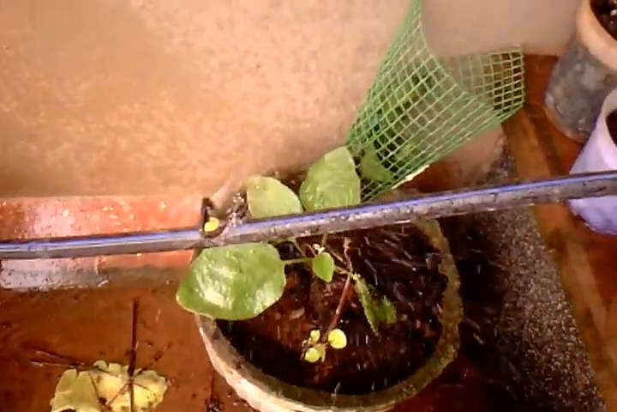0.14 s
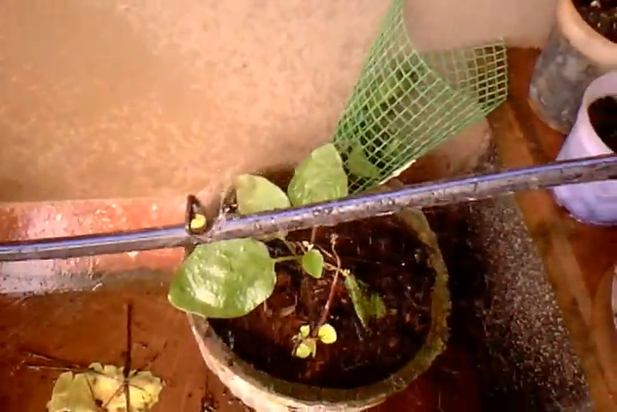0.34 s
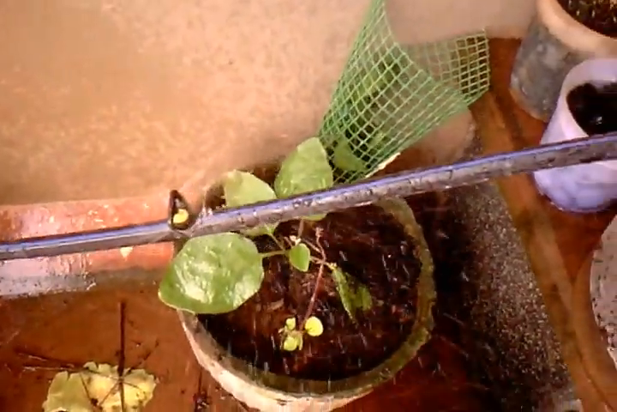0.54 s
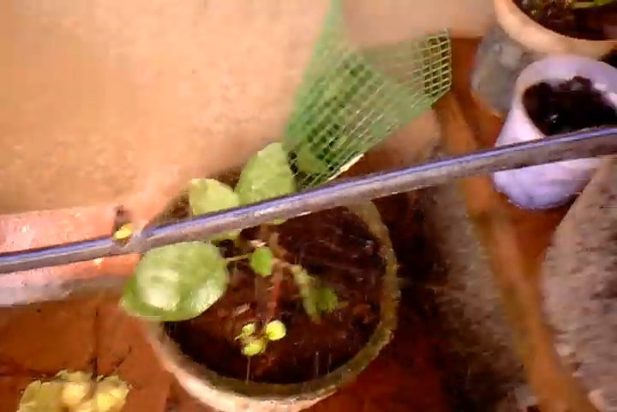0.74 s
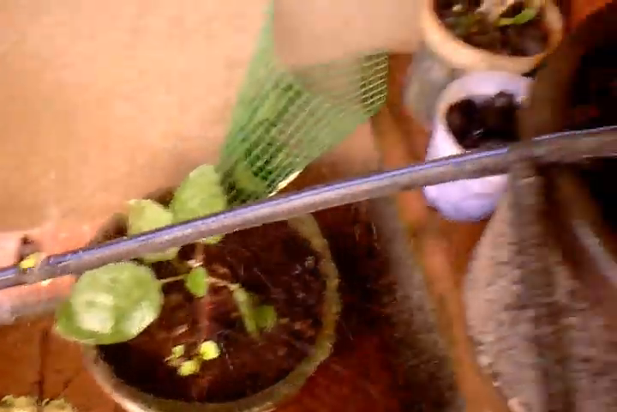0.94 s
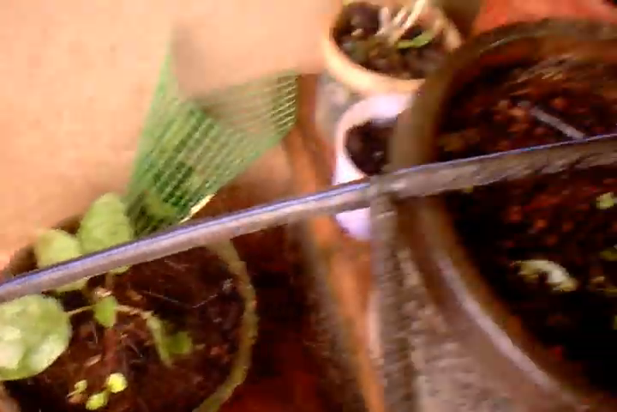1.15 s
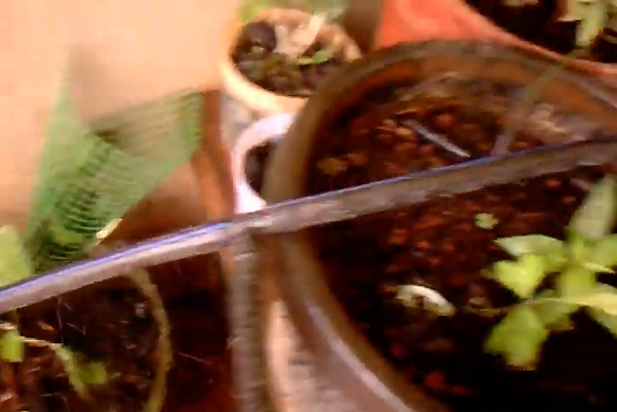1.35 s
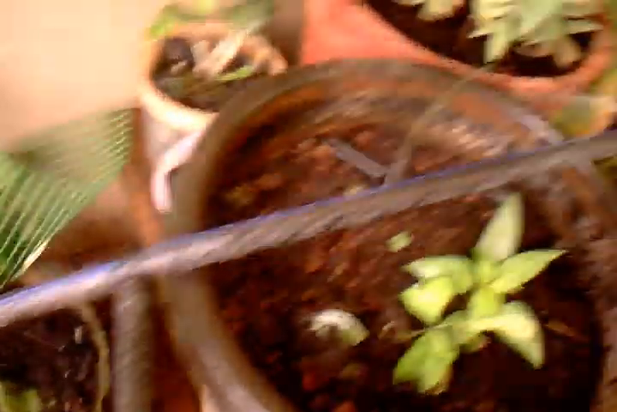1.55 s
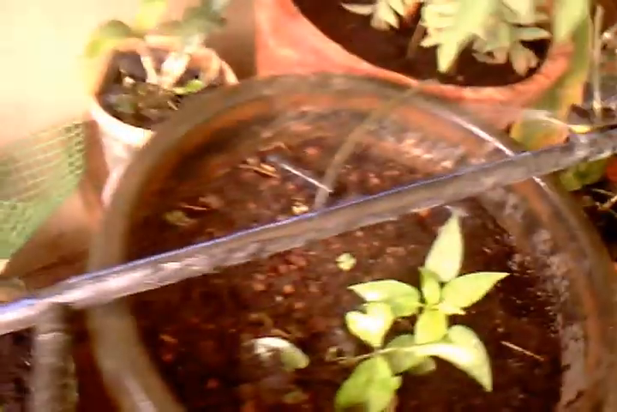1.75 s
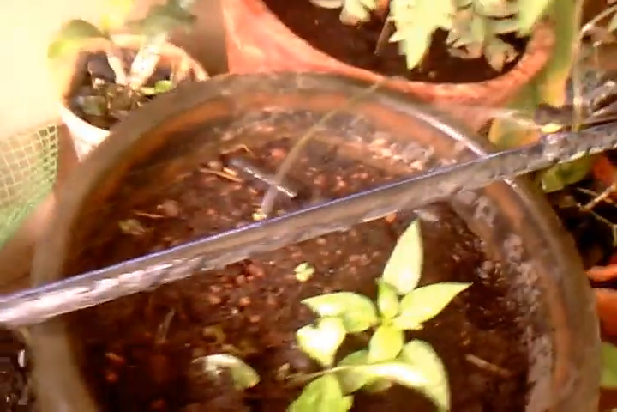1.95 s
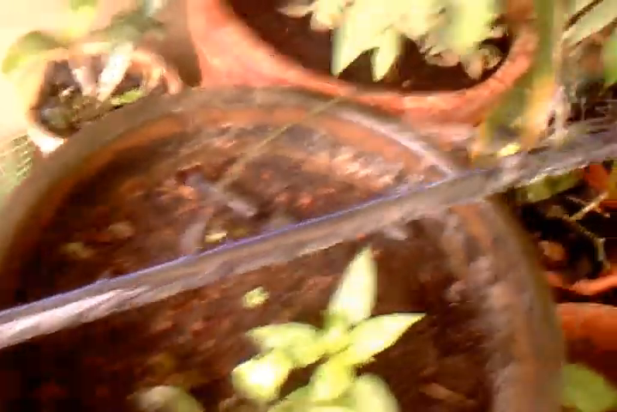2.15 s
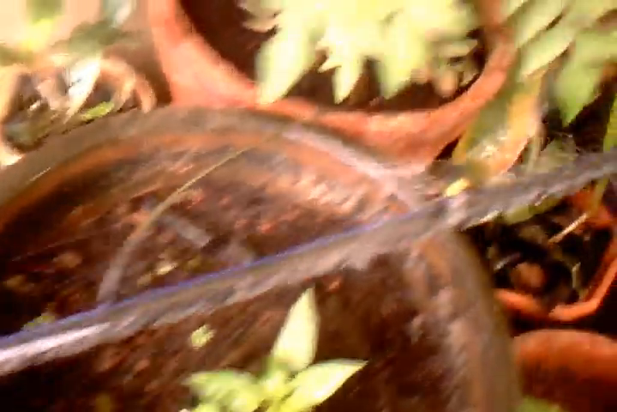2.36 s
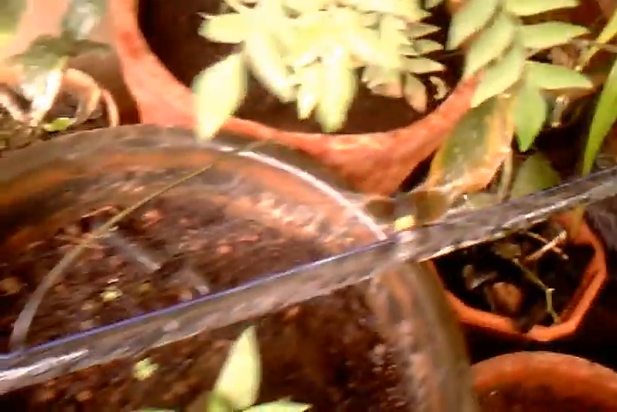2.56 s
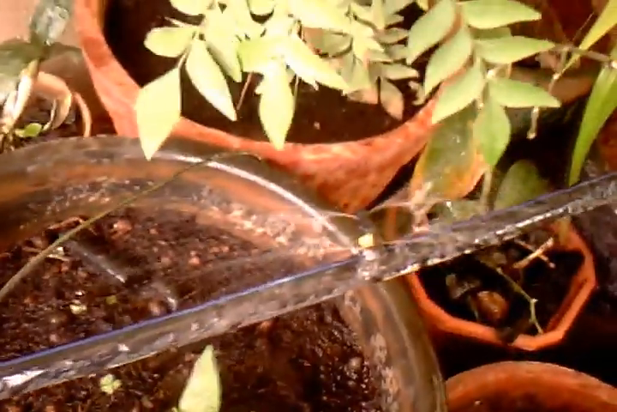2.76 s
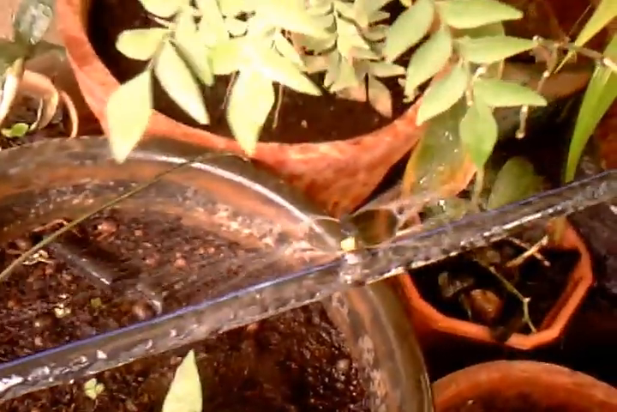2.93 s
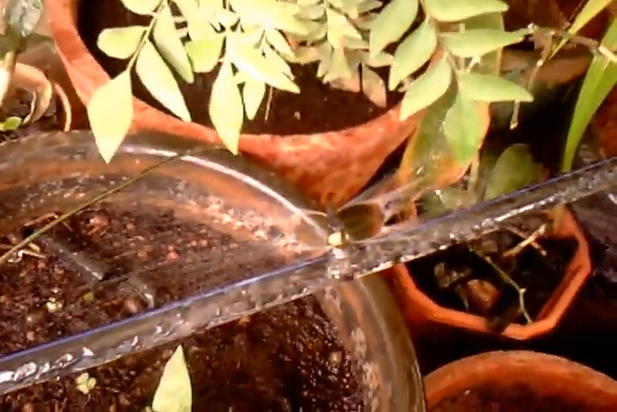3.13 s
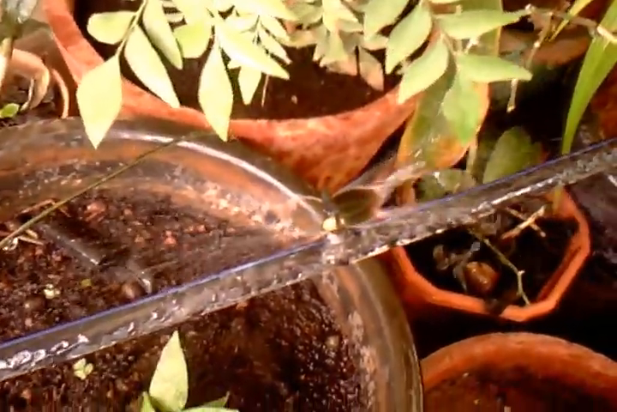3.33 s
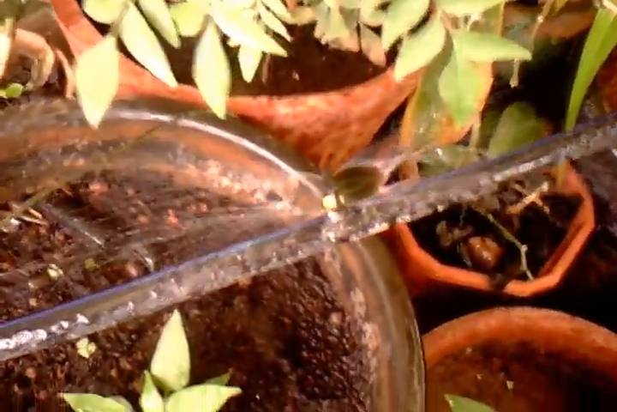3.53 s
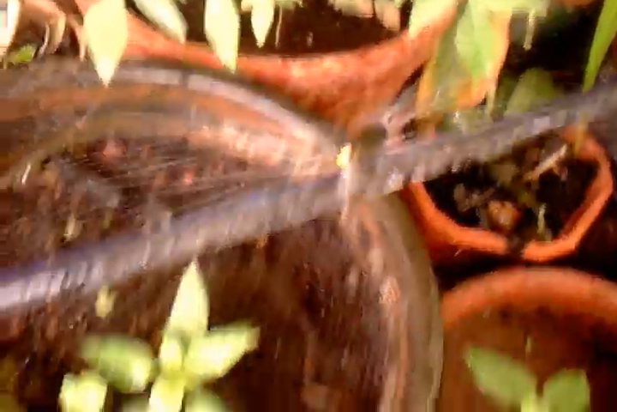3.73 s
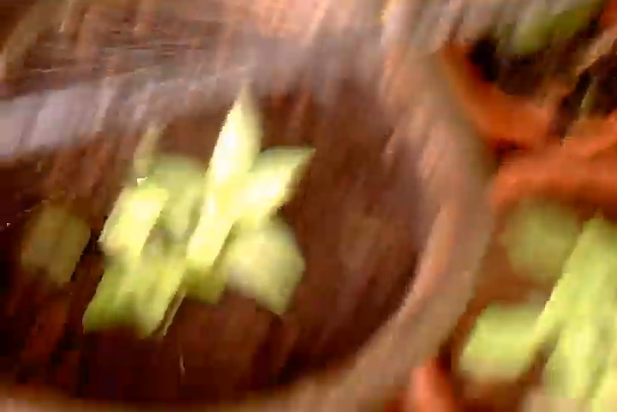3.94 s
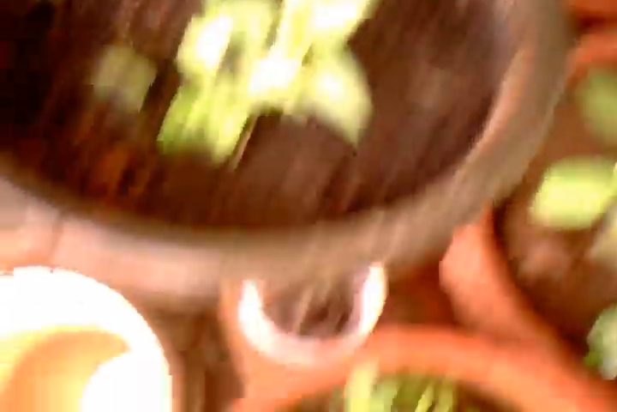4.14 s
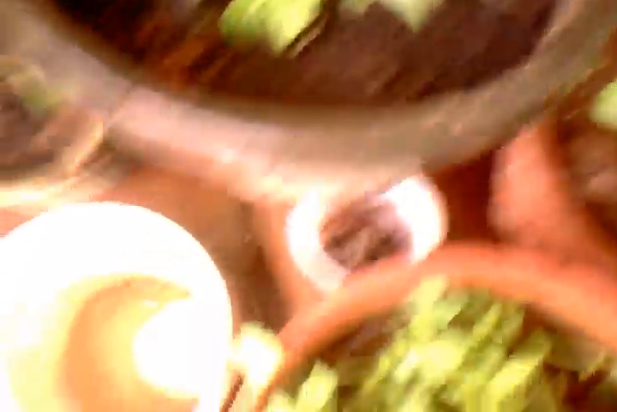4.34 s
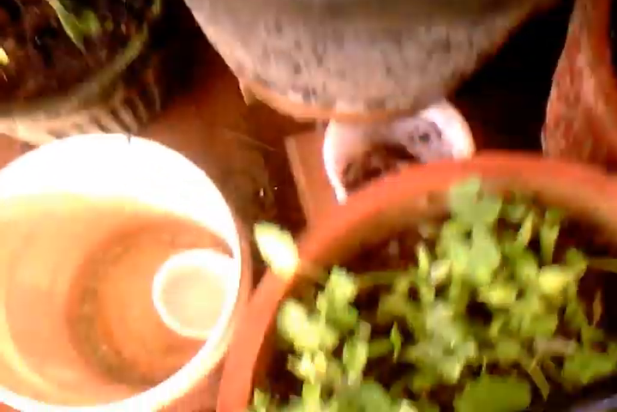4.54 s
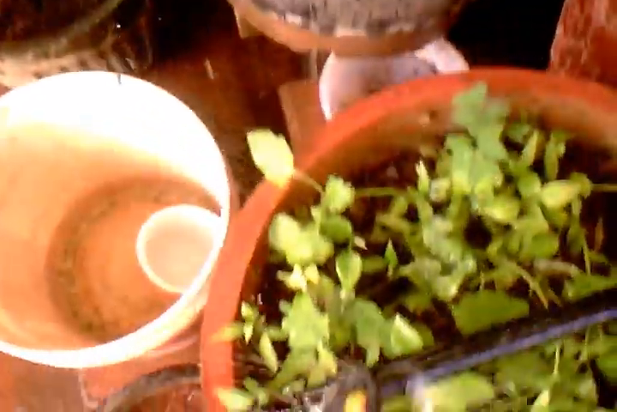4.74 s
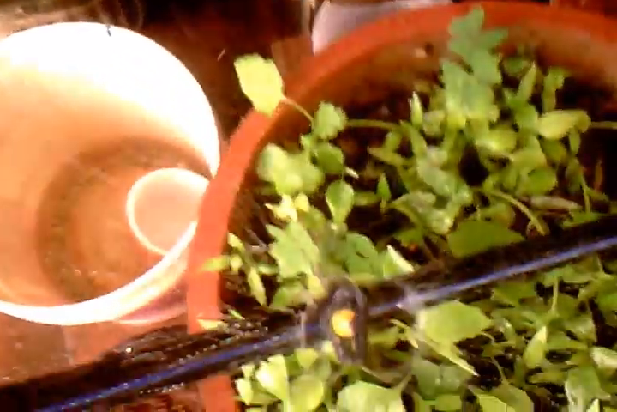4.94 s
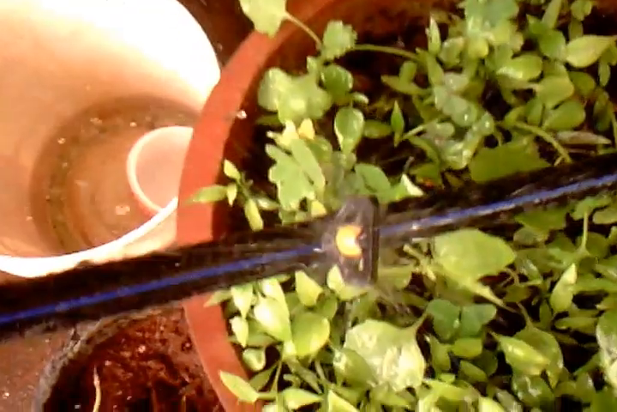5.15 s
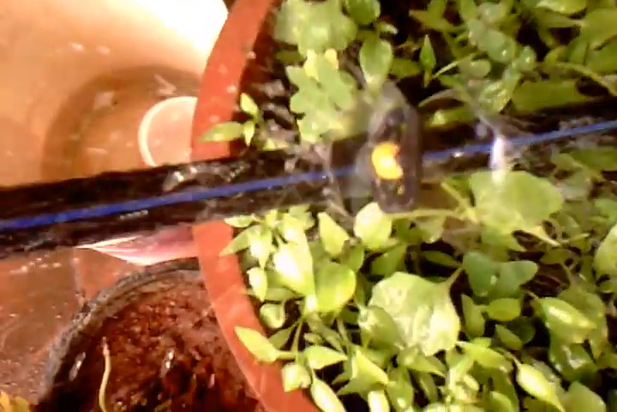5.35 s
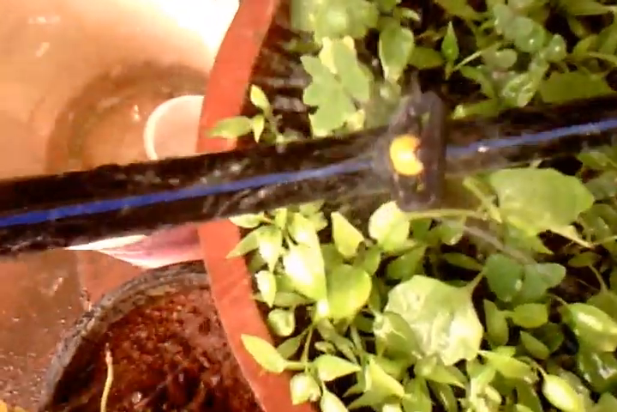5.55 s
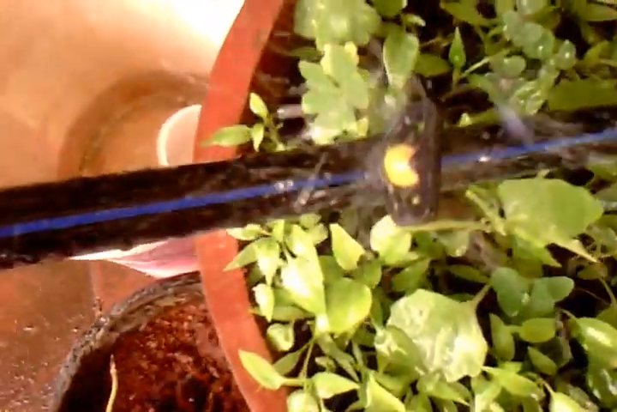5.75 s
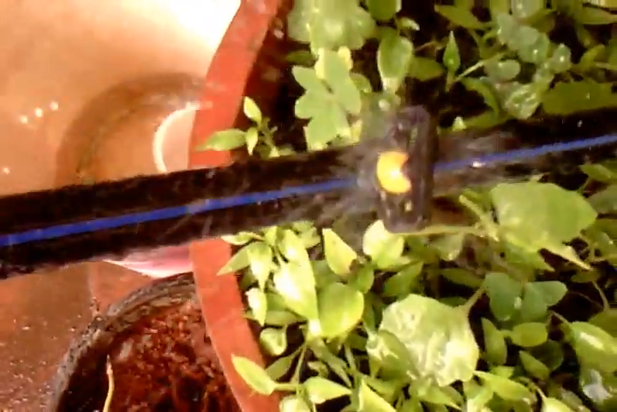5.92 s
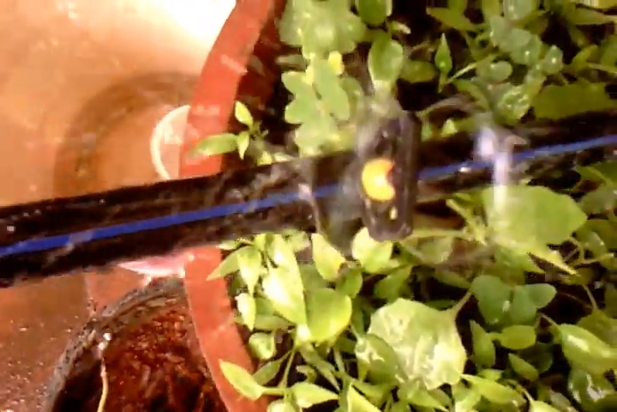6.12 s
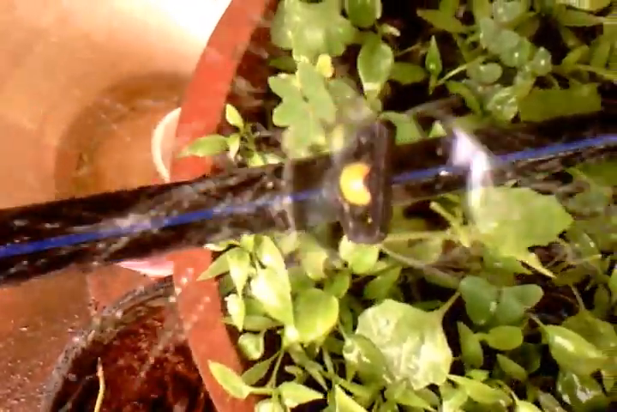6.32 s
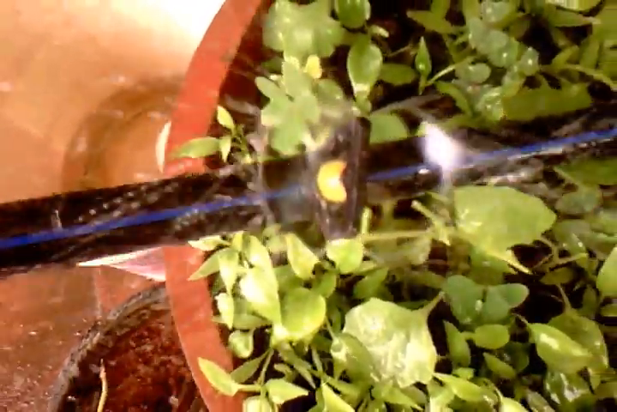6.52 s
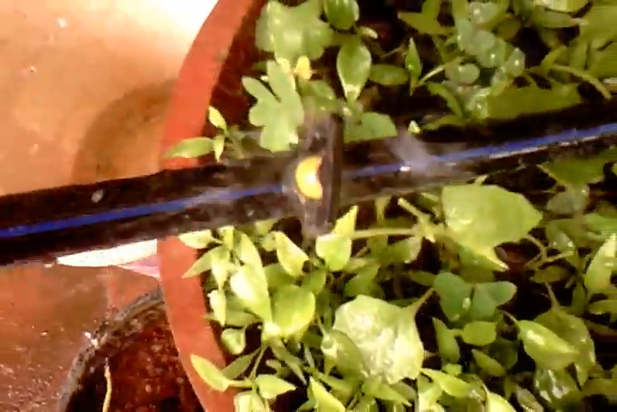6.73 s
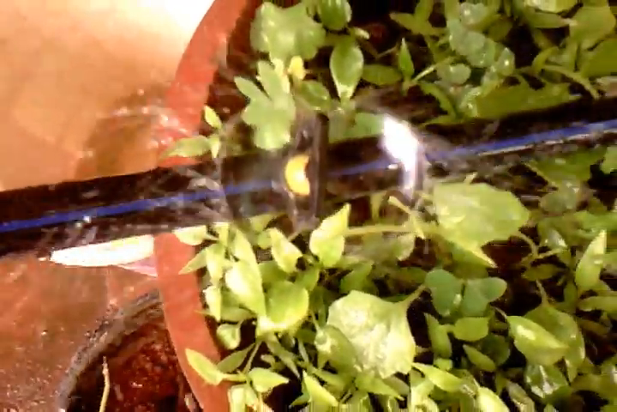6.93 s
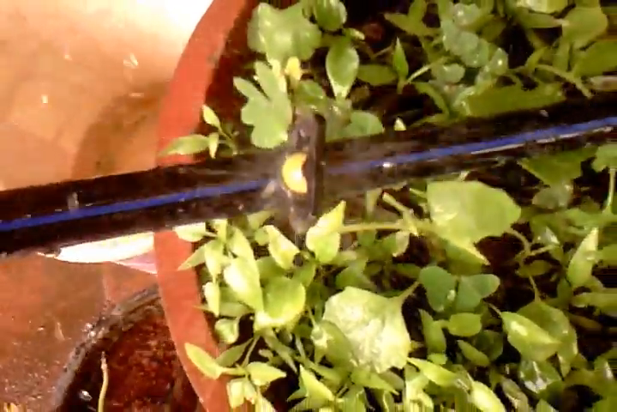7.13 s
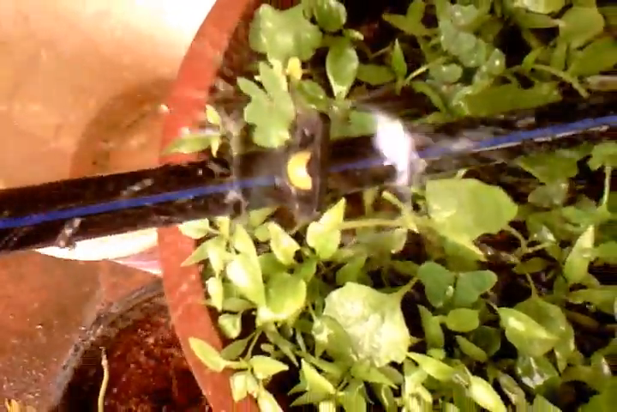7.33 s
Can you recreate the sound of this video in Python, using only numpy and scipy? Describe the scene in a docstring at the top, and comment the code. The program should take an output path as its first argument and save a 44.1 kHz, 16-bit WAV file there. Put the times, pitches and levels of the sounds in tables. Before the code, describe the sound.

Irregular high ticks and wet sputters come from a drip line's spray nozzle, soft at first, then sharp and close.

```python
"""Air trapped in a garden drip line spits through a micro-sprayer on a balcony. Each spurt is a dense
crackle that rings the nozzle's short air column; bursting bubbles pop out on top, and hard walls add a
short tail. Underneath sit far traffic, a hiss of mist and faint chirrs. Three dull knocks bump the phone
that hears it all, in mono at 16 kHz; after the first, spurts and background are louder."""
import sys
import numpy as np
from scipy import signal
from scipy.fft import rfft, irfft
from scipy.io import wavfile
from scipy.ndimage import uniform_filter1d

SR = 44100
rng = np.random.default_rng(int(sys.argv[2]) if len(sys.argv) > 2 else 0)


def generate_wav(signal):
    """Clip the signal to [-1, 1] and save it as 16-bit WAV at the path in sys.argv[1]."""
    frames = np.transpose(np.atleast_2d(signal))
    scaled = np.clip(frames, -1, 1) * 32767
    pcm = np.round(scaled).astype(np.int16)
    wavfile.write(sys.argv[1], SR, pcm)


N = 325458

# Table levels are relative: each layer adds its own gain.
# Spectrum of the far traffic: f/Hz, level/dB
TRAFFIC_SPECTRUM = [(18, -53.5), (30, -20.5), (64, -27), (104, -4.5), (186, -1), (390, -8.5), (428, -9.5),
                    (960, -13.5), (2710, -30), (5550, -39), (7500, -22.5), (9750, -59.5), (16500, -120)]
# Fader moves of the background: t/s, rumble/dB, hiss/dB
BED_LEVELS = [(0.0, -65.5, -64), (.5, -66, -66), (1.9, -65, -63), (3.0, -64.5, -67), (3.8, -66, -67),
              (4.0, -55, -54.5), (4.6, -55, -49.5), (5.0, -54, -54.5), (5.501, -53, -51), (6.4, -53, -53),
              (7.38, -54.5, -54.5)]
# Far chirrs, perhaps insects: start/s, end/s, f/Hz, width/Hz, level/dB
CHIRRS = [ (2.87, 3.14, 3610, 100, -66), (3.0, 3.45, 3410, 100, -63), (3.4, 3.72, 3400, 80, -67),
          (2.95, 3.15, 2550, 70, -78), (3.15, 3.3, 2780, 80, -70), (3.36, 3.55, 2770, 80, -74),
          (3.3, 3.57, 2570, 70, -76), (0.0, 1.7, 3450, 120, -86), (5.6, 7.38, 3330, 130, -72),
          (5.94, 6.06, 3330, 110, -62), (6.3, 7.1, 2950, 90, -74), ]
# Knocks on the phone's body: t/s, level/dB, f/Hz
KNOCKS = [(3.79, -39, 422), (5.758, -43, 510), (6.621, -44.5, 424)]
# The five modes of the nozzle's air column at rest, near multiples of 1.4 kHz: f/Hz, width/Hz
NOZZLE_MODES = [(1400, 700), (2800, 480), (4150, 560), (5500, 720), (6750, 800)]
# A creeping water plug shifts the modes: t/s, mode 2 f/Hz, mode 4 f/Hz, mode 1 boost/dB, mode 2 boost/dB
WATER_PLUG = [(0.1, 3100, 5620, -11, -6.5), (.8, 2860, 5480, -4, 1.5), (1.6, 2580, 5730, -9, -3),
              (2.75, 2810, 5530, -5, -0.5), (3.4, 2700, 5770, -2, -3), (3.8, 2550, 5220, -0.5, -1),
              (4.15, 2530, 5050, 1, -5.5), (4.6, 2820, 5300, 4.5, -1), (5.0, 2870, 5650, -2, -6.5),
              (5.4, 2770, 5260, 2.5, -3), (5.75, 2990, 5440, -2, -1), (6.6, 2950, 5590, -2, -2.5),
              (7.35, 3090, 5450, -11, -5.5)]
# Single bubbles bursting in the nozzle: t/s, level/dB, f/Hz
BUBBLE_POPS = [(0.0613, -32, 6770), (0.154, -41, 6820), (0.3595, -50, 5600), (0.4184, -38, 4900),
               (0.5033, -44, 6800), (0.7098, -52, 6610), (0.85, -48, 3800), (1.0705, -52, 5800),
               (1.1004, -47, 6950), (1.47, -46, 5650), (1.7794, -38, 6460), (1.8203, -39, 6560),
               (2.0692, -53, 6560), (2.129, -50, 5740), (2.1999, -41, 6600), (2.726, -36, 4040),
               (3.1228, -42, 7000), (3.3977, -43, 6900), (3.6007, -37, 5360), (3.671, -31.5, 5440),
               (3.7264, -31.5, 5460), (3.795, -30.5, 6800), (3.8147, -28, 5200), (3.8397, -31, 6560),
               (4.0502, -26, 5460), (4.0804, -10.5, 4930), (4.3206, -38, 5470), (4.357, -25, 4920),
               (4.4243, -28.5, 4240), (4.515, -27, 4870), (4.5324, -12, 5600), (4.6835, -23, 6500),
               (4.786, -42, 6720), (4.9417, -36, 6340), (4.959, -32, 6260), (4.9821, -17.5, 6430),
               (5.0194, -31, 6700), (5.0973, -12, 3670), (5.1412, -9.5, 6350), (5.236, -15, 6330),
               (5.2754, -22, 6460), (5.355, -31, 5400), (5.403, -6, 6510), (5.461, -14, 6640),
               (5.6145, -16, 5120), (5.683, -9, 5100), (5.7379, -13, 3620), (5.9262, -21, 5570),
               (6.0985, -23, 5560), (6.1684, -25, 6710), (6.1749, -18.5, 6670), (6.2572, -18, 4100),
               (6.5395, -31, 6500), (6.743, -13.5, 5650), (6.9209, -15, 5610), (6.9626, -30, 5300),
               (7.01, -11.5, 5500), (7.0678, -32, 6940), (7.2387, -30, 7000), (7.3397, -14.5, 6400),
               (0.0248, -53, 6060), (0.1271, -50, 5670), (0.375, -33, 5600), (0.406, -54, 4840),
               (0.5244, -52, 7040), (0.599, -52, 6600), (0.7764, -37, 4500), (1.0525, -55, 3790),
               (1.1274, -42, 4550), (1.1704, -43, 4160), (1.5194, -48, 6500), (1.8834, -56, 6570),
               (1.9555, -55, 3870), (1.9654, -48, 3900), (2.0318, -47, 6570), (2.0804, -53, 6580),
               (2.2104, -43, 6740), (2.383, -57, 4080), (2.7896, -48, 3800), (2.8085, -42, 5390),
               (2.8964, -50, 6000), (3.051, -53, 3700), (3.0904, -49, 5790), (3.1502, -36, 5600),
               (3.1827, -44, 6810), (3.3494, -51, 3680), (3.8896, -23, 6500), (3.9115, -17, 5600),
               (4.0068, -35, 6630), (4.1274, -14, 5190), (4.1724, -16, 6900), (4.5585, -17, 4310),
               (4.5704, -17, 5110), (4.596, -10, 4100), (4.6309, -11.5, 3990), (5.1058, -7, 4120),
               (5.1484, -17, 6530), (5.1624, -12.5, 5240), (5.1756, -12, 6470), (5.2924, -32, 6710),
               (5.4264, -17, 5500), (5.471, -9.5, 6400), (5.5932, -44, 5280), (5.6914, -11, 5600),
               (5.7219, -21, 3850), (6.2133, -20, 5410), (6.5809, -21, 5660), (6.5889, -13.5, 4350),
               (6.6278, -12, 5730), (6.6692, -22, 5700), (6.7074, -44, 5560), (6.7575, -17, 5100),
               (6.9284, -17, 5700), (7.3524, -15, 5140)]
# Spurts of air: t/s, hold/s, level/dB, change over the hold/dB, fullness/dB (low modes against high),
# brightness/dB (mode 5 against mode 4), mode 3 f/Hz
AIR_SPURTS = [(0.059, 0.04, -48, -3, -13, 0, 4700), (0.13, 0.03, -65, 21, -16, 4, 4330),
              (0.16, 0.11, -45, -12.5, -5.5, -2, 4870), (0.356, 0.025, -54.5, 9, -11.5, 1, 4600),
              (0.413, 0.042, -51, 4, -13, 5, 4920), (0.707, 0.036, -58.5, -21, -18, 18, 4450),
              (0.74, 0.062, -61.5, 8.5, -6, 0, 4380), (0.841, 0.045, -60.5, 2.5, -5, 3, 4080),
              (1.093, 0.086, -61.5, 4, -2, -3, 4030), (1.464, 0.09, -57, -3, -5, 1, 3850),
              (1.764, 0.031, -64, 6.5, -3.5, 12, 3700), (1.791, 0.053, -67.5, 12.5, -7.5, 14, 3860),
              (2.066, 0.026, -64, 3, -13.5, 14, 4000), (2.191, 0.072, -58, -4, -7.5, 5, 3970),
              (2.717, 0.13, -55, -1.5, -4, 2, 4100), (3.126, 0.077, -56.5, 3, -6.5, 3, 3940),
              (3.394, 0.014, -57, 2, -19, 12, 3970), (3.601, 0.014, -49, -19, 2, -36, 4000),
              (3.669, 0.014, -47, -11, -10.5, 1, 4650), (3.723, 0.0075, -46, -19, -14, -19, 4370),
              (3.74, 0.006, -39, -22, -14, -15, 4350), (3.752, 0.014, -54, -1, -18, -6, 4480),
              (3.789, 0.053, -51.5, 7, -14, 1, 4720), (3.834, 0.064, -36, -9, -15, -1, 4730),
              (3.885, 0.039, -35, -1, -10.5, 2, 4200), (3.921, 0.094, -39.5, -16, -26, -3, 4230),
              (3.995, 0.042, -53.5, 7.5, -26, 2, 4380), (4.046, 0.02, -40.5, -7, -26, -15, 4620),
              (4.081, 0.077, -24.5, -6, -7.5, -3, 4200), (4.17, 0.023, -30, -9.5, -11, 0, 4250),
              (4.313, 0.034, -47, -8, -25, 7, 4410), (4.351, 0.011, -34.5, -5.5, -15.5, -5, 4400),
              (4.421, 0.01, -42, 1, -13, 0, 4400), (4.498, 0.055, -42.5, 13, -2.5, -3, 4520),
              (4.553, 0.087, -31, 3, -5.5, -3, 3950), (4.645, 0.038, -37.5, -17, -5, 0, 4130),
              (4.677, 0.081, -42, -22, -9, 2, 4080), (4.782, 0.0052, -45.5, -4, -26, 12, 4190),
              (4.949, 0.033, -62.5, 20, -23, 14, 4270), (4.98, 0.0081, -36.5, -10, -9.5, 11, 4060),
              (5.014, 0.024, -39, 4, -12, 2, 4150), (5.09, 0.02, -25.5, 3.5, -4, 7.5, 3900),
              (5.132, 0.0035, -22, -29, -17.5, 7, 4200), (5.145, 0.014, -24.5, -4, -10, 3, 4200),
              (5.162, 0.0085, -28, -20, -14, 7, 4200), (5.175, 0.013, -23, -13, -10, -2, 3990),
              (5.233, 0.0056, -24, -10.5, -11.5, 2, 4100), (5.252, 0.015, -41, -15, -19, 7, 4300),
              (5.271, 0.023, -41, 4, -27, 6, 4200), (5.348, 0.024, -37.5, 2.5, -6, -5, 4240),
              (5.401, 0.03, -25.5, 1, -3, -2, 4280), (5.454, 0.025, -35, -2.5, -8.5, 6, 4400),
              (5.61, 0.0074, -28, -2, -9.5, 4, 4060), (5.676, 0.02, -25, 2.5, -7.5, 4, 4100),
              (5.706, 0.033, -35.5, -4, -17, 5, 4050), (5.739, 0.028, -19.5, -15.5, -5, 3, 4220),
              (5.923, 0.0056, -20, -19, -20, -12, 4300), (6.095, 0.0041, -25.5, -8.5, -15, 6, 4130),
              (6.166, 0.037, -33.5, -2, -10, 2, 4170), (6.213, 0.029, -29, -10, -4, -8.5, 4100),
              (6.255, 0.028, -20.5, -20.5, -2, -5.5, 4130), (6.536, 0.016, -39, -2, -15, 1, 4160),
              (6.552, 0.023, -33, 1.5, -8.5, 2, 4070), (6.578, 0.074, -28.5, -4, -4.5, -1.5, 4160),
              (6.666, 0.0075, -19.5, -20, -12, -11, 4230), (6.739, 0.026, -41.5, 4.5, -11.5, -6, 4560),
              (6.805, 0.0085, -45, -19, -15, 0, 4460), (6.918, 0.033, -25, -5, -5.5, 0, 4150),
              (6.958, 0.019, -26, -3.5, -3, -8, 3970), (7.009, 0.027, -24.5, -12, -5, 0, 4070),
              (7.064, 0.011, -39.5, -1.5, -7, 6, 4300), (7.238, 0.0045, -32.5, -9, -9.5, -5, 4390),
              (7.327, 0.0051, -36, -2, -11, -2, 4160), (7.342, 0.04, -26, -22, -4.5, 4, 4020)]

MODE_DB = (-14.5, 1, 3.5, -1.5, -2.5)  # base balance of modes 1-5 in a spurt
FULL_SHARE = (1, 1, 0.98, 0.092, 0.034)  # how far each mode follows fullness
BRIGHT_SHARE = (0.24, 0.041, 0.25, -0.36, 0.32)  # how far each follows brightness
ATTACK_S, DROP_DB, RELEASE_DB_PER_S, RELEASE_S = 0.0039, -8, -500, 0.12
SPLAT_HZ, SPLAT_WIDTH_HZ, SPLAT_DB = 810, 1100, -22  # dull splatter of the water thrown out
POPS_PER_S, POP_OVER_DB, POP_SCATTER_DB = 130, 4.5, 9  # stray bubbles: rate, top over the spurt, range
COMB_HZ, ECHO_DB, WALLS_DB = 498.5, -23.5, -11.5
MIC_RATE_HZ, MIC_CEILING = 16000, 0.42


def undb(db):
    """Decibels to gain."""
    return 10 ** (np.asarray(db) / 20)


def unit(x):
    """Scale to an RMS of 1."""
    return x / np.sqrt(np.mean(x ** 2))


def band(x, hz, width):
    """Two-pole resonance, gain 1 at the centre."""
    return signal.lfilter(*signal.iirpeak(hz, hz / width, fs=SR), x)


def steep_band(x, hz, width):
    """The same resonance twice, for steeper skirts."""
    return band(band(x, hz, width), hz, width)


def wobble(rate):
    """Glide between random values, rate of them a second; RMS 1."""
    step = int(SR / rate)
    targets = rng.standard_normal(N // 100)[:N // step + 1]
    return unit(uniform_filter1d(np.repeat(targets, step)[:N], step))


def coloured_noise(points):
    """Noise shaped by points of f/Hz, level/dB."""
    hz, db = np.transpose(points)
    bins_hz = np.maximum(np.fft.rfftfreq(N, 1 / SR), 1)
    gain = undb(np.interp(np.log(bins_hz), np.log(hz), db))
    return unit(irfft(rfft(rng.standard_normal(N)) * gain, N))


def crackle(rate, spread_db, air_db):
    """Random clicks of uneven but bounded size over a hiss of escaping air."""
    size_db = spread_db * np.minimum(rng.exponential(size=N), 3)
    clicks = (rng.random(N) < rate / SR) * undb(size_db) * rng.uniform(-0.68, 1, N)
    return unit(clicks) + undb(air_db) * rng.standard_normal(N)


def pings(events, decay_cycles, gain_db):
    """One damped sine for each event of t/s, level/dB, f/Hz."""
    out = np.zeros(N + SR)
    for start, db, hz in events:
        cycles = np.arange(int(6 * decay_cycles * SR / hz)) * hz / SR
        shape = (1 - np.exp(-cycles / 0.74)) * np.exp(-cycles / decay_cycles)
        i = int(start * SR)
        out[i:i + len(cycles)] += undb(db + gain_db) * shape / shape.max() * np.sin(2 * np.pi * cycles)
    return out[:N]


def traffic_and_mist():
    """The bed: gently swaying traffic rumble, and the sprayers' fine mist as hiss."""
    times, *faders = np.transpose(BED_LEVELS)
    rumble_db, hiss_db = (np.interp(np.arange(N) / SR, times, fader) for fader in faders)
    mist = unit(band(crackle(2100, spread_db=-8.0, air_db=-0.5), hz=4600, width=4300))
    traffic = undb(rumble_db + 0.5 + 0.82 * wobble(2.89)) * coloured_noise(TRAFFIC_SPECTRUM)
    return traffic + undb(hiss_db - 8.5) * mist


def chirrs():
    """Narrow bands of noise that fade in, flicker and fade out."""
    out, t = 0, np.arange(N) / SR
    for start, end, hz, width, db in CHIRRS:
        fade = np.clip(np.minimum(t - start, end - t) / 0.022, 0, 1)
        tone = unit(steep_band(rng.standard_normal(N), hz, width))
        out = out + fade * undb(db + 2.1 * wobble(30)) * tone
    return out


def knocks():
    """The phone's body gives a dull thud that dies within a few cycles."""
    return pings(KNOCKS, decay_cycles=2.5, gain_db=7.5)


def wall_tail(x, t60_s, predelay_s):
    """Short diffuse reverb from floor tiles, pots and wall."""
    t = np.arange(int(0.3 * SR)) / SR
    tail = rng.standard_normal(len(t)) * np.exp(-np.log(1000) * t / t60_s) * (t > predelay_s)
    return signal.fftconvolve(x, tail / np.sqrt(np.sum(tail ** 2)))[:N]


def pot_echo(x):
    """A pot rim close by returns the sound 2 ms late; mixed in, it combs the spectrum."""
    lag = round(SR / COMB_HZ)
    return undb(ECHO_DB) * np.pad(x[:-lag], (lag, 0))


def stray_bubbles():
    """Pop events at random moments of each spurt's hold, each pitched near one of the top three modes."""
    rest_hz = np.transpose(NOZZLE_MODES)[0]
    events = []
    for start, hold, level_db, change_db, *_ in AIR_SPURTS:
        gap, size, mode, tune = rng.random((4, 16))
        delay = np.cumsum(-np.log(1 - gap)) / POPS_PER_S
        db = level_db + change_db * delay / hold + POP_OVER_DB - POP_SCATTER_DB * size
        hz = rest_hz[2 + (3 * mode).astype(int)] * (1 + 0.1 * (tune - 0.5))
        events += list(np.transpose([start + delay, db, hz])[delay < hold])
    return events


def bubble_pops():
    """Each bursting bubble pings at its own pitch, and its click rings the nozzle's modes 2-5."""
    events = list(BUBBLE_POPS) + stray_bubbles()
    times, db, _ = np.transpose(events)
    clicks = np.zeros(N)
    clicks[np.minimum((times * SR).astype(int), N - 1)] = undb(db)
    body = sum(steep_band(clicks, hz, width) for hz, width in NOZZLE_MODES[1:])
    return pings(events, decay_cycles=6.5, gain_db=-5.5) + undb(-3.5) * body


def spurt_envelope(hold, level_db, change_db):
    """Hard attack, a hold that swells or sags; then water shuts the path and the rest dribbles out."""
    t = np.arange(int((hold + RELEASE_S) * SR)) / SR
    attack = np.clip(t / ATTACK_S, 1e-3, 1)
    held_db = level_db + change_db * np.minimum(t / hold, 1)
    release_db = (t > hold) * (DROP_DB + RELEASE_DB_PER_S * (t - hold))
    return attack * undb(held_db + release_db)


def air_spurts():
    """Crackle flutters as water and air trade places, ringing a column that the water plug retunes."""
    flutter = np.pad(crackle(1200, spread_db=1.2, air_db=-5.0) * undb(1.34 * wobble(200)), (0, SR))
    # A click strikes each mode differently.
    strikes = undb([np.pad(2.27 * wobble(100), (0, SR)) for _ in NOZZLE_MODES])
    detunes = 1 + 0.011 * rng.standard_normal((len(AIR_SPURTS), len(NOZZLE_MODES)))
    plug_times, *plug_curves = np.transpose(WATER_PLUG)
    rest_hz, widths = np.transpose(NOZZLE_MODES)
    out = np.zeros(N + SR)
    for (start, hold, level_db, change_db, full_db, bright_db, hz3), detune in zip(AIR_SPURTS, detunes):
        envelope = spurt_envelope(hold, level_db, change_db)
        span = slice(int(start * SR), int(start * SR) + len(envelope))
        gust = flutter[span] * envelope
        hz2, hz4, boost1_db, boost2_db = (np.interp(start, plug_times, curve) for curve in plug_curves)
        mode_hz = detune * [rest_hz[0], hz2, hz3, hz4, rest_hz[4]]
        mode_db = np.array(MODE_DB) + full_db * np.array(FULL_SHARE) + bright_db * np.array(BRIGHT_SHARE)
        mode_db[:2] += [boost1_db, boost2_db]
        for hz, db, width, strike in zip(mode_hz, mode_db, widths, strikes):
            out[span] += undb(db) * np.sqrt(SR / width) * steep_band(gust * strike[span], hz, width)
        splatter = np.sqrt(SR / SPLAT_WIDTH_HZ) * band(gust, SPLAT_HZ, SPLAT_WIDTH_HZ)
        out[span] += undb(SPLAT_DB + full_db) * splatter
    return undb(-4.0) * out[:N]


def scene():
    """The nozzle and its reflections up front, over knocks and background; both channels alike."""
    nozzle = air_spurts() + bubble_pops()
    nozzle += pot_echo(nozzle)
    mono = nozzle + undb(WALLS_DB) * wall_tail(nozzle, t60_s=0.092, predelay_s=0.0019)
    mono += knocks() + chirrs() + traffic_and_mist()
    return np.array([mono, mono])


def record(dry):
    """The phone rounds loud pops and cuts the top; upsampling mirrors the treble faintly above 8 kHz."""
    rounded = MIC_CEILING * np.tanh(dry / MIC_CEILING)
    dulled = signal.sosfilt(signal.ellip(6, 1, 40, 7250, fs=SR, output="sos"), rounded)
    dulled = signal.sosfilt(signal.butter(4, 8200, fs=SR, output="sos"), dulled)
    mirror = 2 * dulled * np.cos(2 * np.pi * MIC_RATE_HZ * np.arange(N) / SR)
    mirror = signal.sosfilt(signal.butter(5, [8000, 9350], "bandpass", fs=SR, output="sos"), mirror)
    high_cut = signal.ellip(8, 0.2, 70, 10900, fs=SR, output="sos")
    return signal.sosfilt(high_cut, dulled + undb(-16) * mirror)


dry = scene()
out = record(dry)
generate_wav(out)
```